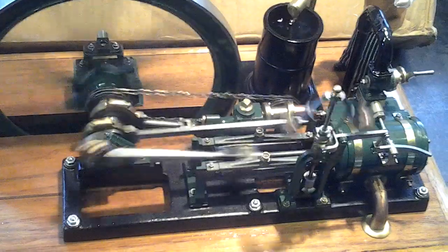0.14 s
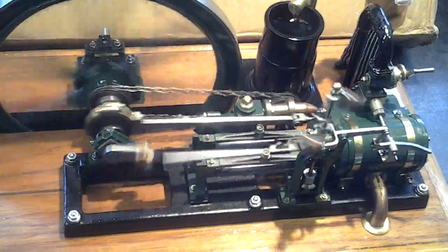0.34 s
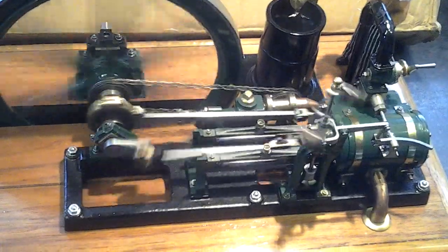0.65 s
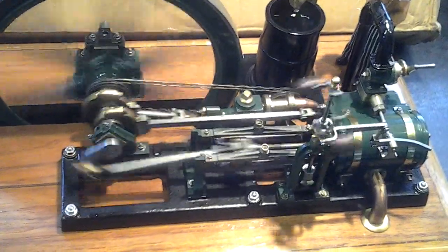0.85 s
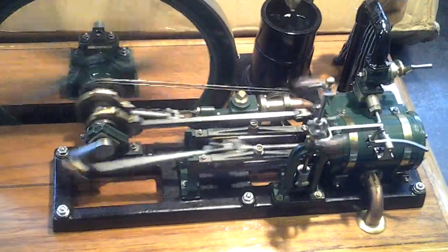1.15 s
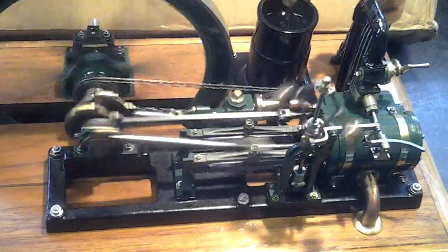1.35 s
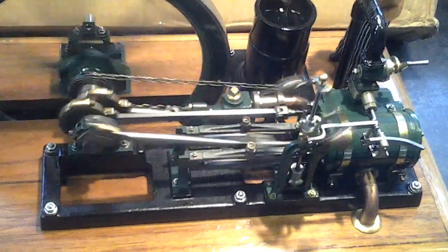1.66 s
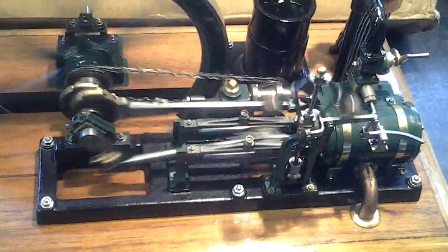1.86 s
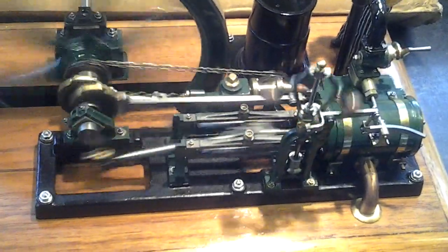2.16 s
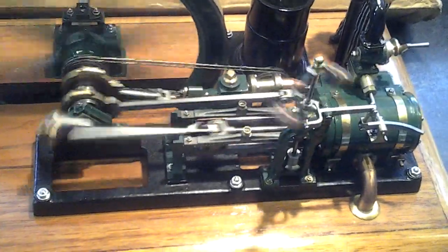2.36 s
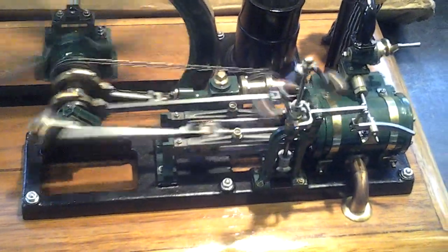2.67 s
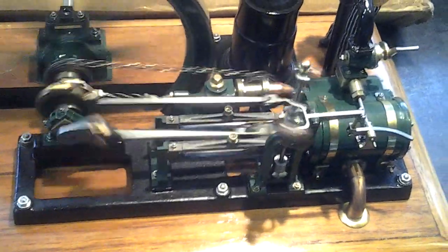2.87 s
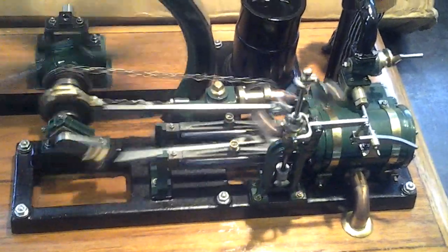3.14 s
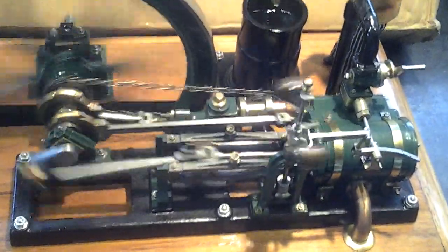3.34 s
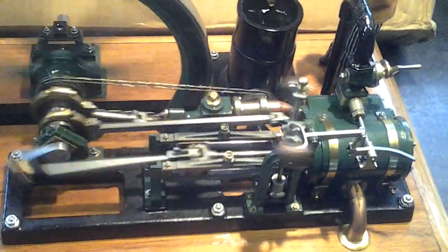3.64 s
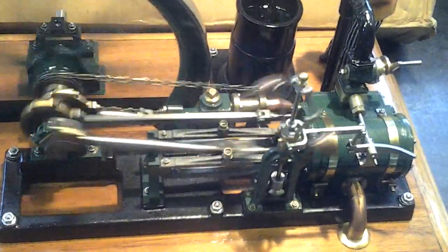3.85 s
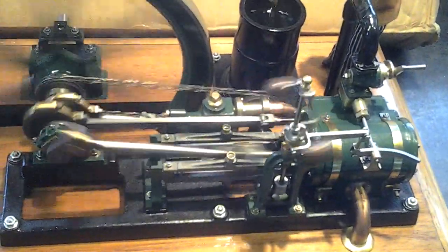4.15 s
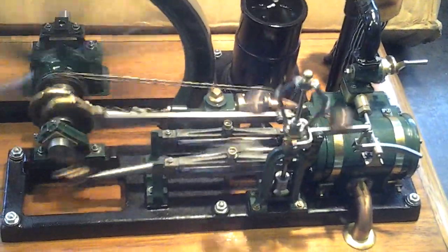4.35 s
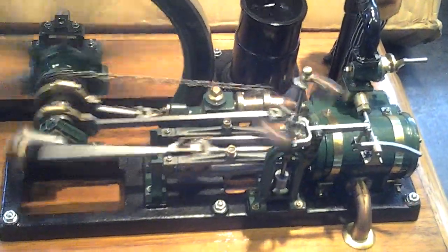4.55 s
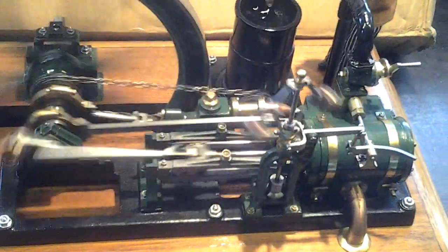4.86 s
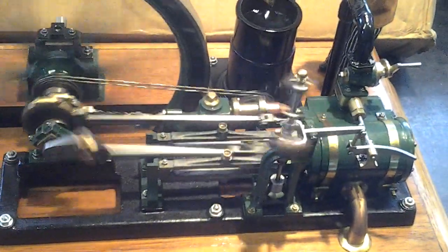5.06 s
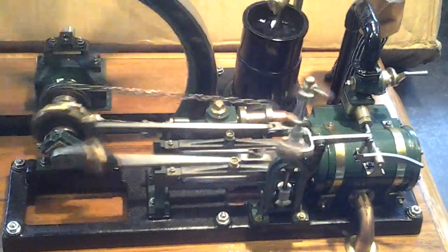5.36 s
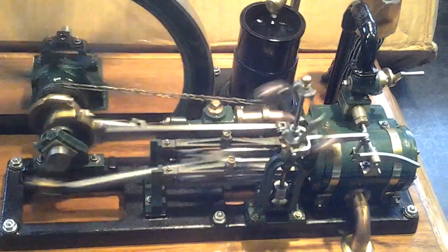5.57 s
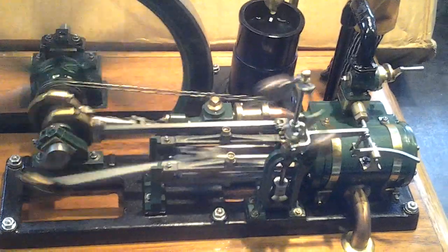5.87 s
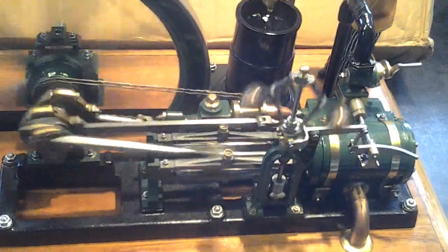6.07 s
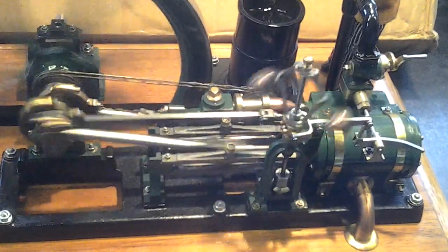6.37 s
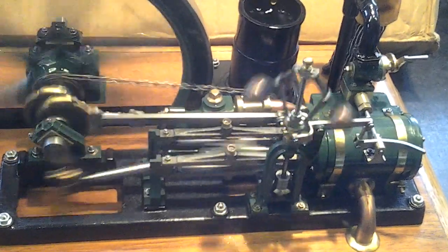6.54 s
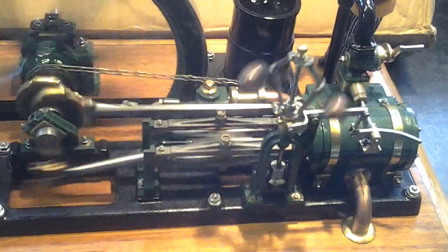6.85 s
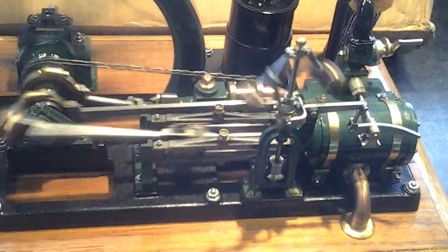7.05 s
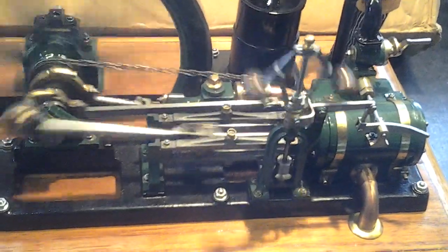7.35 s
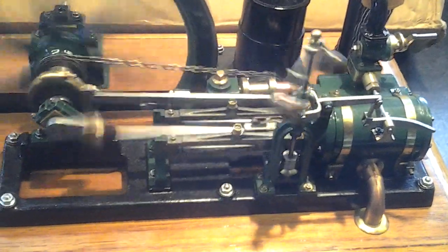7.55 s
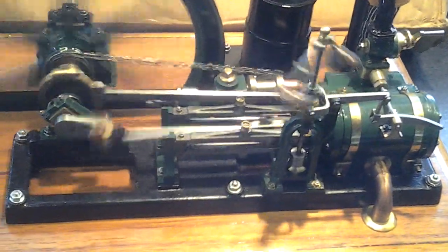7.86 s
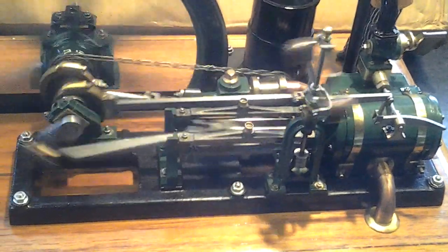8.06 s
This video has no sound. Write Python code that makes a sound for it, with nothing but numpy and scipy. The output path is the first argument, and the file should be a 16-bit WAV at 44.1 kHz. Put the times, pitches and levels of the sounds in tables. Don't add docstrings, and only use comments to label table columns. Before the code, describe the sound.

A model engine driven by compressed air clatters at an even, brisk pace: double knock, light thuds, irregular steel clacks, rattling links and rubbing slides, with a high airy whistle on each stroke. Short puffs escape around two and six seconds. From about 5.3 seconds a low motor hum runs up quickly behind it, then a steady tank drone grows. Close small microphone indoors, soft room rumble, constant hiss.

```python
import sys
import numpy as np
from scipy import signal
from scipy.fft import rfft, irfft, next_fast_len
from scipy.io import wavfile
from scipy.ndimage import uniform_filter1d

SR = 44100
rng = np.random.default_rng(int(sys.argv[2]) if len(sys.argv) > 2 else 0)


def attenuation_scalar(level_db):
    decades = np.asarray(level_db, float) / 20
    return 10 ** decades


def output_pcm(signal):
    pcm = np.clip(np.atleast_2d(signal).T, -1, 1) * 32767
    wavfile.write(sys.argv[1], SR, np.round(pcm).astype(np.int16))


N = 362061


def look_up(rows, at):
    return np.interp(at, *np.transpose(rows))


def rms_one(x):
    return x / np.sqrt(np.mean(x ** 2) + 1e-20)


def drift(rate_hz):
    r = np.exp(-80 * np.pi * rate_hz / SR)
    slow = signal.lfilter([1], [1, -2 * r, r * r], rng.standard_normal(N // 40 + 2002))[2000:]
    return np.interp(np.arange(N) / 40, np.arange(len(slow)), rms_one(slow))


def ring(clicks, hz, t60):
    r = attenuation_scalar(-60 / (t60 * SR))
    w = 2 * np.pi * hz / SR
    return signal.lfilter([0, np.sin(w)], [1, -2 * r * np.cos(w), r * r], clicks + 1e-18)


def clicks(times, sizes):
    out = np.zeros(N)
    at = np.round(np.asarray(times) * SR).astype(int)
    np.add.at(out, np.clip(at, 0, N - 1), sizes)
    return out


def coloured(spectrum):
    size = next_fast_len(N)
    points = np.array(spectrum)
    hz = np.maximum(np.arange(size // 2 + 1) * SR / size, 1)
    shape = attenuation_scalar(np.interp(np.log(hz), np.log(points[:, 0]), points[:, 1], left=-120))
    return rms_one(irfft(rfft(rng.standard_normal(size)) * shape, size)[:N])


def band_pass(x, order, low_hz, high_hz):
    return signal.sosfilt(signal.butter(order, [low_hz, high_hz], "band", fs=SR, output="sos"), x)


# (frequency [Hz], level per Hz [dB])
RUMBLE = [(12, -46), (20, -29), (48, -12.5), (107, -10), (162, -23), (223, 3), (250, 8.5), (320, 19.5),
          (550, -120)]


def room_rumble():
    return attenuation_scalar(-51) * coloured(RUMBLE)


# (frequency [Hz], level per Hz [dB])
HISS = [(3240, -8), (5500, -9.5), (5960, -11), (6260, -9.5), (8770, -5.5), (11500, -3), (12000, 1),
        (12900, -9), (13000, -4), (14400, -6.5)]
# (frequency [Hz], level [dB])
WHINE = [(11112, -79), (11650, -77), (12337, -76), (12397, -63.5), (12456, -78)]


def electronics():
    t = np.arange(N) / SR
    buzz = 1 + .12 * np.sin(2 * np.pi * 119.5 * t) + .1 * np.sin(2 * np.pi * 358.5 * t)
    whine = sum(attenuation_scalar(db + 3) * np.sin(2 * np.pi * hz * t) for hz, db in WHINE)
    return attenuation_scalar(-53 + .5 * drift(24)) * coloured(HISS) * buzz + whine


# (multiple of shaft speed [1], level [dB])
SHAFT_TONES = [(1, -63), (2, -58.5), (3, -51), (4, -60.5), (5, -55), (6, -49.5), (7, -51), (8, -59),
               (12, -83), (14, -62)]


def compressor():
    t = np.arange(N) / SR
    lock_s, full_hz, slip_hz, creep_s, run_up_hz_per_s = 5.45, 60.1, 2.5, .85, 62
    hz = full_hz - slip_hz * np.exp(-np.maximum(t - lock_s, 0) / creep_s)
    hz -= run_up_hz_per_s * np.clip(lock_s - t, 0, .5)
    turn = 2 * np.pi * np.cumsum(hz) / SR

    swell_db = 200 * np.clip(t - 5.28, -1, 0)
    dip_db = -11 * np.exp(-((t - 5.6) / 0.13) ** 2)
    slow_db = 130 * np.log10(hz / 59)
    tones = 0
    for k, db in SHAFT_TONES:
        level_db = db + 3 + slow_db * (k < 3) + dip_db * (k == 3) + .3 * k * drift(4)
        tones = tones + attenuation_scalar(level_db) * np.sin(k * turn + rng.uniform(0, 6))
    pump = attenuation_scalar(-51.5) * rms_one(band_pass(rng.standard_normal(N), 2, 150, 600))

    tank_db = -45 - 12 * np.exp(np.minimum((6.3 - t) / .45, 2))
    tank = attenuation_scalar(tank_db + 1.5 * drift(6)) * np.sin(10 * turn)
    return attenuation_scalar(swell_db) * (tones + pump) + tank


# (time [s], first knock level [dB], rebound level [dB])
TURNS = [(0.1082, 1.5, -0.8), (0.4202, 3, -1), (0.7308, 2.3, -0.5), (1.0429, 3.5, -2.5),
         (1.3557, 2.1, -3.5), (1.6695, 3, -4), (1.9847, 3.2, -3), (2.2993, 2.5, -2), (2.612, 3, -3),
         (2.9251, 2.3, -2), (3.2378, 2.8, -1), (3.5508, 1.5, -4.5), (3.8612, 1.5, -2.5), (4.1748, 3.5, -5),
         (4.4877, 1.5, -1.5), (4.8023, 2, -0.5), (5.1134, 1, 2), (5.426, 2.5, 0), (5.7398, 3.5, 0.5),
         (6.052, 0, -0.5), (6.3679, 1, -1), (6.6819, 0.5, 0), (6.9945, 2.5, 0.5), (7.3085, -1, 1),
         (7.623, 1, -0.5), (7.9377, 0.5, 0)]


def turn_starts():
    s = np.array(TURNS)[:, 0]
    return np.r_[2 * s[0] - s[1], s, 2 * s[-1] - s[-2]]


def crank():
    s = turn_starts()
    return np.interp(np.arange(N) / SR, s, np.arange(len(s))) % 1


def looped(shares, scatter_s, listed, near_s):
    s = turn_starts()
    times = s[:-1, None] + np.diff(s)[:, None] * shares
    times = (times + scatter_s * rng.standard_normal(times.shape)).ravel()
    clear = np.abs(times[:, None] - np.array(listed)[:, 0]).min(axis=1) > near_s
    return times, clear & (times > 0) & (times < N / SR)


# (time of full flow [s], level [dB], rise [s], hold [s], fall [s])
SPURTS = [
    (1.42, -58, .02, .004, 0.045),
    (2.226, -54, 0.022, 0.0046, 0.023),
    (2.443, -48.5, 0.055, 0.027, 0.13),
    (2.522, -43.5, .12, 0.051, 0.043),
    (5.934, -49.5, .04, 0.018, .05),
    (6.222, -47.5, 0.022, .006, 0.029),
]
# (frequency [Hz], level per Hz [dB])
SPURT_COLOUR = [(710, -15), (1200, 2.5), (1960, -7), (2430, -14), (3030, -12), (4880, -5.5), (6460, -17.5),
                (7480, -14), (8830, -13.5), (12600, -7), (14400, -13)]


def spurts():
    t = np.arange(N) / SR
    gain = np.zeros(N)
    for s, peak_db, rise_s, hold_s, fall_s in SPURTS:
        away = np.maximum((s - t) / rise_s, (t - s - hold_s) / fall_s)
        gain = np.maximum(gain, attenuation_scalar(peak_db - 20 * np.maximum(away, 0)))
    return coloured(SPURT_COLOUR) * gain * attenuation_scalar(5.5 + 2.0 * drift(40))


# (opens [share of turn], shuts [share of turn], level open [dB],
# level before shutting [dB])
OPENINGS = [
    (0.058, 0.373, -47.5, -55),
    (0.5, 0.906, -50, -53.5),
]


def valve_db(share):
    edge, shut_db = 0.016, -62.5
    rows = []
    for opens, shuts, open_db, late_db in OPENINGS:
        rows += [(opens, shut_db), (opens + edge, open_db)]
        rows += [(shuts, late_db), (shuts + edge, shut_db)]
    return look_up(rows, share)


# (frequency [Hz], width [Hz], level [dB])
WHISTLE = [
    (3646, 83, -1),
    (3776, 67, -5),
]


def valve(whistle_db):
    out = 0
    for hz, width_hz, level_db in WHISTLE:
        tone = rng.standard_normal(N)
        for _ in range(2):
            tone = ring(tone, hz, 1.6 / width_hz)
        out = out + rms_one(tone) * attenuation_scalar(level_db + 1.5 * drift(14))
    return out * attenuation_scalar(whistle_db - 2.5)


# (place [share of turn], level [dB])
STROKE = [(0, -45), (.07, -42.5), (.15, -35.5), (.38, -45.5), (.53, -39.5), (.88, -40), (.92, -41),
          (1, -39.5)]


def stroke_db(share):
    return look_up(STROKE, share)


# (frequency [Hz], level per Hz [dB])
SLIDE_COLOUR = [(710, -18.5), (1200, 4.5), (1280, -10.5), (1460, -2.5), (1590, -9.5), (1930, -7.5),
                (3690, -10.5), (5410, -24), (5970, -68), (6500, -32.5), (8450, -70), (14300, -120)]


def slides(rub_db):
    grit = 1 + .5 * (rng.random(N) < 150 / SR) * rng.exponential(27, N)
    grit = signal.lfilter([.02], [1, -.98], grit)
    level_db = -47.5 + 0.13 * (rub_db + 38) + 2.0 * drift(10.6)
    return attenuation_scalar(level_db) * coloured(SLIDE_COLOUR) * grit


def rattle():
    per_s, level_db, spread_db = 60, -49, 3.2
    size_db = level_db + spread_db * np.minimum(rng.exponential(1, N), 3)
    sizes = (rng.random(N) < per_s / SR) * attenuation_scalar(size_db)
    pitches_hz = np.geomspace(1600, 4000, 9)
    rings = sum(ring(sizes * rng.standard_normal(N), hz, 0.0061) for hz in pitches_hz)
    return signal.sosfilt(signal.butter(4, 4300, fs=SR, output="sos"), rings)


TICK_SCATTER_DB = 4.0
# (place [share of turn], peak level [dB], pitch [Hz])
PINS = [
    (.005, -36.5, 2020),
    (0.077, -53, 3600),
    (.745, -34, 2700),
]


def pins():
    share, level_db, hz = np.transpose(PINS)
    s, kept = looped(share, .001, TICKS, .01)
    vary = np.clip(rng.standard_normal(len(s)), -2, 2)
    level_db = np.resize(level_db, len(s)) + TICK_SCATTER_DB * vary
    return np.c_[s, level_db, np.resize(hz, len(s))][kept]


# (time [s], level [dB])
SLACK = [(0, 6), (.6, 1), (.9, -12), (1.3, 2), (2, -10), (2.5, -2), (3.2, -1.5), (3.8, 3.5), (5.5, -2.5),
         (6.1, 5), (6.6, -10.5), (7.4, 2), (8.21, -26)]


def gear_teeth():
    s, kept = looped(.09 + np.arange(8) / 8, .004, TICKS, .015)
    vary = np.clip(rng.standard_normal((len(s), 2)), -2, 2)
    level_db = -33.5 + look_up(SLACK, s) + TICK_SCATTER_DB * vary[:, 0]
    hz = 2800 * attenuation_scalar(vary[:, 1])
    return np.c_[s, level_db, hz][kept]


# (time [s], peak level [dB], pitch [Hz])
TICKS = [(0.0157, -25.5, 3440), (0.0958, -28, 3340), (0.412, -22.5, 3270), (1.0121, -30, 3000),
         (1.1387, -24, 2900), (1.253, -25.5, 2650), (1.4223, -25, 3020), (1.52, -24, 3400),
         (1.5774, -24, 2200), (2.3973, -26.5, 2850), (2.736, -18.5, 3400), (3.707, -22.5, 2980),
         (3.8496, -25, 3000), (3.93, -28.5, 2580), (3.9824, -18, 2800), (4.0882, -25, 3120),
         (4.598, -26, 2700), (4.7859, -26.5, 2860), (5.0623, -25.5, 2550), (5.1852, -25, 2880),
         (5.3956, -18.5, 2410), (5.7126, -19.5, 2900), (5.914, -27.5, 3400), (5.998, -21.5, 2980),
         (6.1185, -24.5, 2900), (6.1561, -27, 3750), (6.9685, -27, 2900), (7.1339, -24.5, 2510),
         (7.5295, -23, 2170), (8.1264, -23.5, 2440)]


def ticks():
    out = np.zeros(N + 2000)
    t = np.arange(2000) / SR
    rows = np.r_[np.array(TICKS), pins(), gear_teeth()]
    spread = rng.uniform(-1.055, 1, (len(rows), 10))
    snaps = rng.standard_normal(N + 2000)
    for (s, peak_db, hz), offsets in zip(rows, spread):
        at = round(s * SR)
        near = np.sin(2 * np.pi * hz * t) * attenuation_scalar(-60 * t / .014)
        cluster = sum(np.sin(2 * np.pi * hz * attenuation_scalar(4.16 * o) * t + 3 * o) for o in offsets)
        cluster = cluster * attenuation_scalar(-60 * t / 0.0055)
        frame = 0.11 * np.sin(2 * np.pi * 1486 * attenuation_scalar(offsets[0]) * t) * attenuation_scalar(-60 * t / 0.052)
        snap = snaps[at:at + 2000] * attenuation_scalar(-60 * t / 0.039) + frame
        snap = snap * attenuation_scalar(0.28 * (peak_db + 21.5))
        onset = 1 - np.exp(-t / .0008)
        out[at:at + 2000] += attenuation_scalar(peak_db) * (near + .2 * cluster + .7 * snap) * onset
    treble_edge = attenuation_scalar(-25) * band_pass(out[:N], 1, 4000, 6500)
    return treble_edge + band_pass(out[:N], 6, 1000, 4200)


# (time [s], level [dB], upper over lower modes
# [dB])
THUDS = [(0.02, -31, -12), (0.096, -30, 0), (0.283, -26, 1), (0.36, -28, -9), (0.49, -30, 9),
         (0.909, -28.5, 1), (1.145, -31, 4), (1.424, -27, -6), (1.522, -31, 9), (1.605, -31.5, -12),
         (1.863, -25, -3), (2.179, -28.5, -8), (2.22, -26, -1), (2.459, -28, -3), (2.549, -28, -2),
         (2.737, -23.5, 2), (3.651, -32.5, 12), (3.708, -30.5, 8), (3.802, -28, -3), (3.985, -24.5, -2),
         (4.6, -32, -6), (5.219, -27, -10), (5.399, -25.5, -7), (5.909, -26, 0), (5.984, -25.5, -1),
         (7.473, -26, -8), (7.512, -30, 6), (8.133, -26, -8)]
# (place [share of turn], level [dB],
# upper over lower modes [dB])
CONTACTS = [
    (0.221, -42, 6),
    (.34, -36, 1),
    (.52, -36, -7),
    (.62, -46.5, 0),
    (.74, -36, -1.5),
    (.8, -38.5, -11),
]


def thuds():
    share, level_db, bright_db = np.transpose(CONTACTS)
    s, kept = looped(share, 0.003994, THUDS, .02)
    vary = np.clip(rng.standard_normal((len(s), 2)), -2, 1.3)
    level_db = np.resize(level_db, len(s)) + 2.5 * vary[:, 0]
    bright_db = np.resize(bright_db, len(s)) + 8 * vary[:, 1]
    return np.r_[np.array(THUDS), np.c_[s, level_db, bright_db][kept]]


# (frequency [Hz], first knock level [dB], rebound level [dB],
# decay by 60 dB [s])
BED = [(182.2, -43.5, -41.5, 0.11), (287.44, -30, -41.5, 0.15), (298.4, -27.5, -29.5, 0.09),
       (324.7, -30, -33.5, 0.091), (360.7, -35.5, -32.5, 0.079), (413.6, -40, -28, 0.15),
       (449, -31.5, -27.5, 0.08), (483.3, -31.5, -24, 0.091), (554, -30.5, -26, 0.054),
       (666, -43, -32.5, 0.17), (707.4, -27, -30.5, 0.09), (757, -73, -34, 0.16), (851, -24.5, -35, 0.045),
       (917, -36.5, -33, 0.062), (969.5, -24.5, -24.5, 0.07), (1024, -19, -27, 0.047),
       (1142, -32, -32, 0.073), (1279, -35.5, -35.5, 0.048), (1530, -56, -46, 0.088),
       (1900, -43, -38, 0.058), (2118, -27.5, -36, 0.021), (2900, -26, -37, 0.014)]


def bed(rub_db):
    seat_s, touch_db = 0.004452, -6.5
    rebound_s, rise_s = .0198, 0.0025
    s, first_db, rebound_db = np.transpose(TURNS)
    thud_s, thud_db, bright_db = thuds().T
    grit = (rng.random(N) < 900 / SR) * attenuation_scalar(2.1 * np.minimum(rng.exponential(1, N), 4))
    hits, rubbing = np.zeros(N), np.zeros(N)
    for hz, a_db, b_db, t60 in BED:
        vary = rng.standard_normal((len(s), 2))
        touch_side, seat_side, rebound_side = rng.choice([-1, 1], size=3)
        blow = attenuation_scalar(first_db + a_db + 1.56 * vary[:, 0])
        knock = touch_side * clicks(s, blow * attenuation_scalar(touch_db))
        knock += seat_side * clicks(s + seat_s, blow)
        back_s = s + rebound_s + 0.00043 * vary[:, 1]
        back_db = rebound_db + b_db - 0.5 + 0.86 * vary[:, 1]
        knock += rebound_side * clicks(back_s, attenuation_scalar(back_db))

        tilt_db = bright_db * (.5 if hz > 620 else -.5)
        mode_db = thud_db + tilt_db + (a_db + b_db) / 2 + 20
        mode_db = mode_db + 2.85 * rng.standard_normal(len(thud_s))
        both = knock + clicks(thud_s, rng.choice([-1, 1], len(thud_s)) * attenuation_scalar(mode_db))
        hits += ring(both, hz, t60) - 0.94 * ring(both, hz, rise_s * np.log(1000))
        grains = grit * rng.choice([-1, 1], N)
        rubbing += attenuation_scalar(b_db) * ring(grains, hz, 1.07 * t60) / np.sqrt(t60)
    return hits + rms_one(rubbing) * attenuation_scalar(rub_db + 2.0 * drift(21))


def scene():
    share = crank()
    rub_db = stroke_db(share)
    engine = spurts() + valve(valve_db(share)) + slides(rub_db) + rattle() + ticks() + bed(rub_db)
    engine = signal.sosfilt(signal.butter(4, 150, "high", fs=SR, output="sos"), engine)
    return (room_rumble() + electronics() + compressor() + engine)[None]


def muted_bands(x):
    size = next_fast_len(N)
    spectrum = rfft(x, size)
    hz = np.arange(size // 2 + 1) * SR / size
    edges = np.linspace(5350, 8400, 13)
    out = x.copy()
    masking = (uniform_filter1d(x ** 2, size=2000) / np.mean(x ** 2) + .1) ** .15
    for low, high in zip(edges, edges[1:]):
        band = irfft(spectrum * ((hz >= low) & (hz < high)), size)[:N]
        threshold = masking * attenuation_scalar(-74.5 + 2 * drift(10)) ** 2
        faint = uniform_filter1d(band ** 2, size=1500) < threshold
        out -= band * uniform_filter1d(faint * 1., size=500)
    return out


def top_cut(x):
    return signal.sosfilt(signal.butter(12, 14540, fs=SR, output="sos"), x)


def record(dry):
    mix = muted_bands(dry[0])[None]
    return top_cut(mix)


dry = scene()
out = record(dry)
output_pcm(out)
```